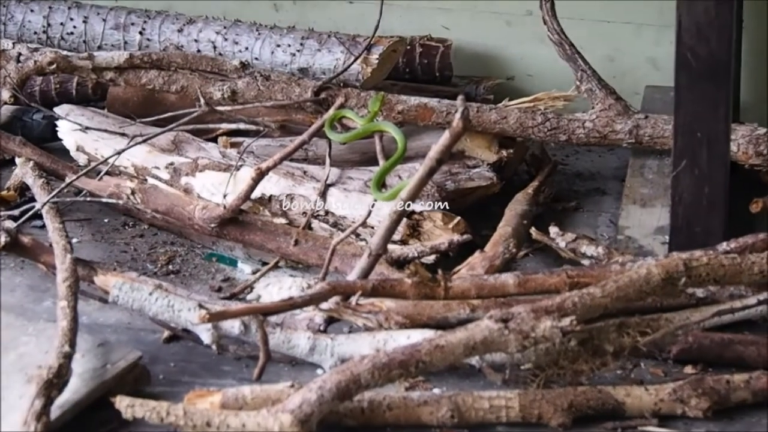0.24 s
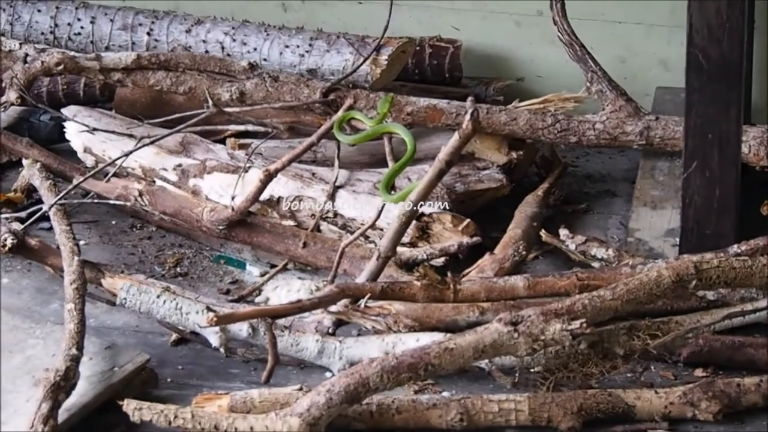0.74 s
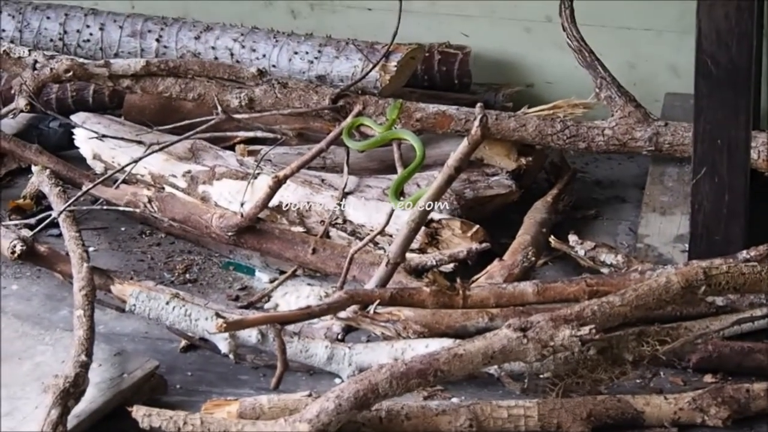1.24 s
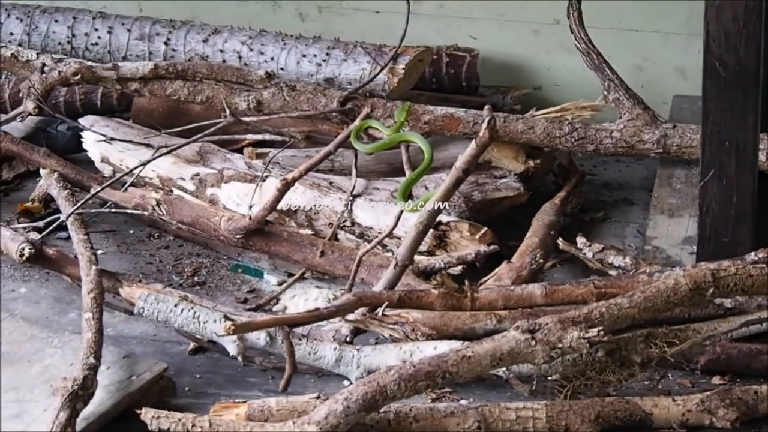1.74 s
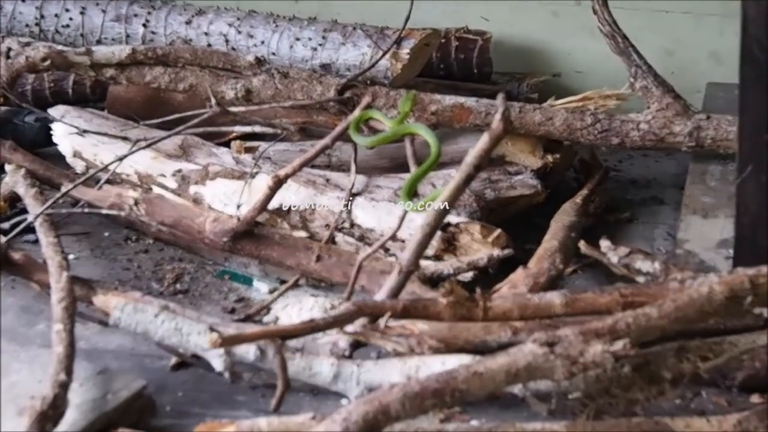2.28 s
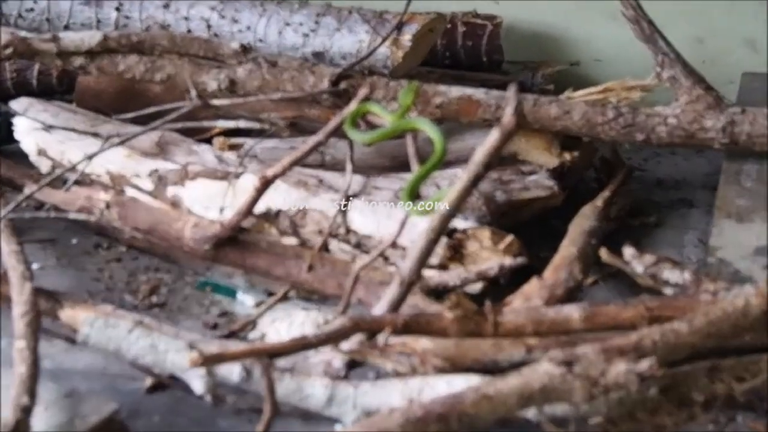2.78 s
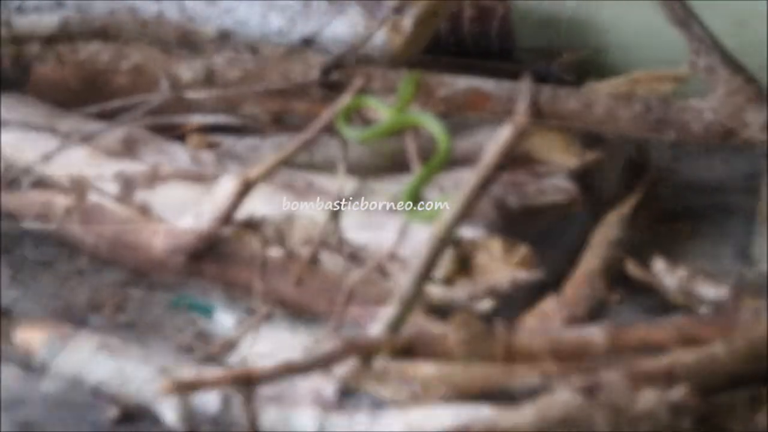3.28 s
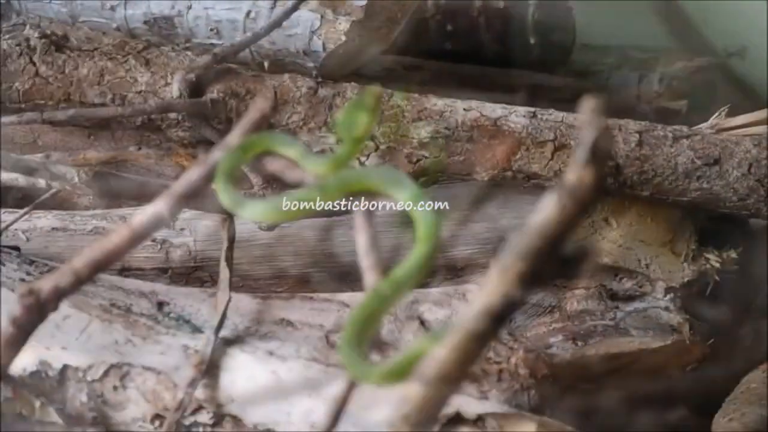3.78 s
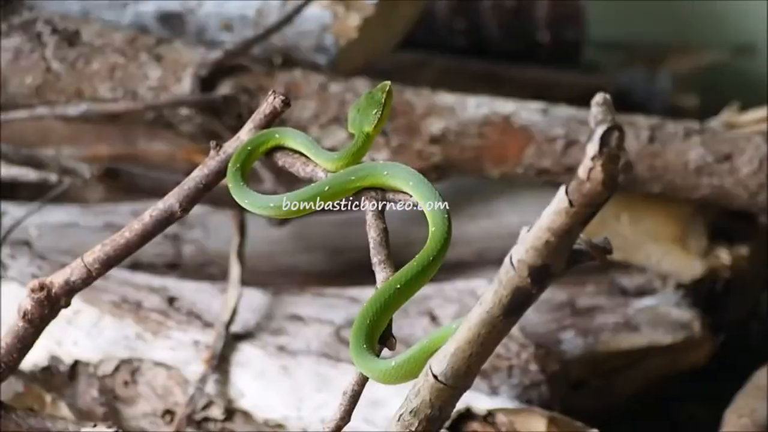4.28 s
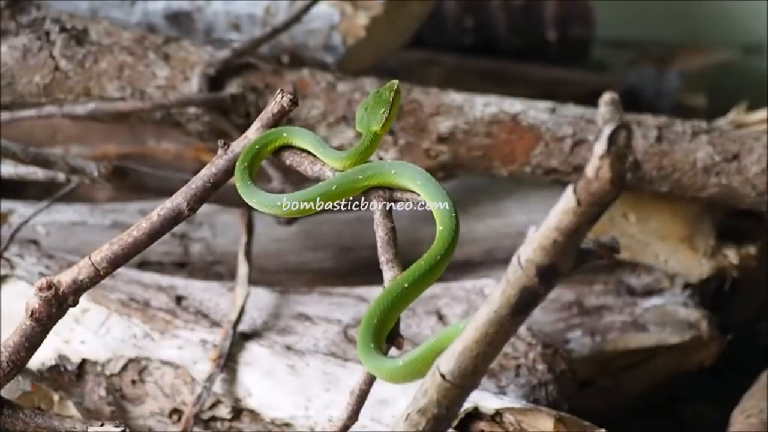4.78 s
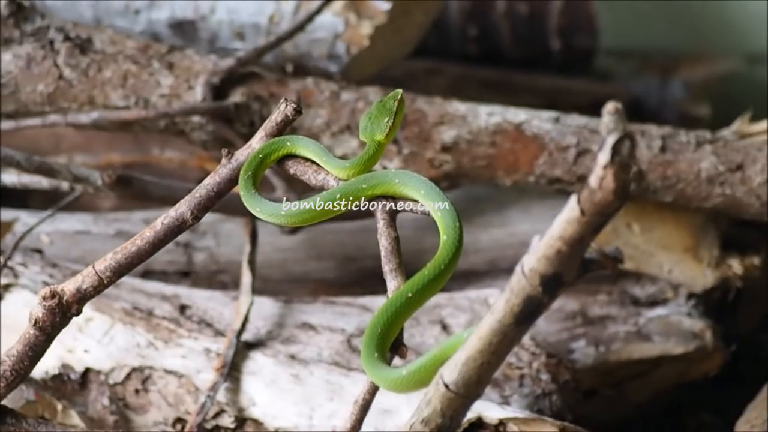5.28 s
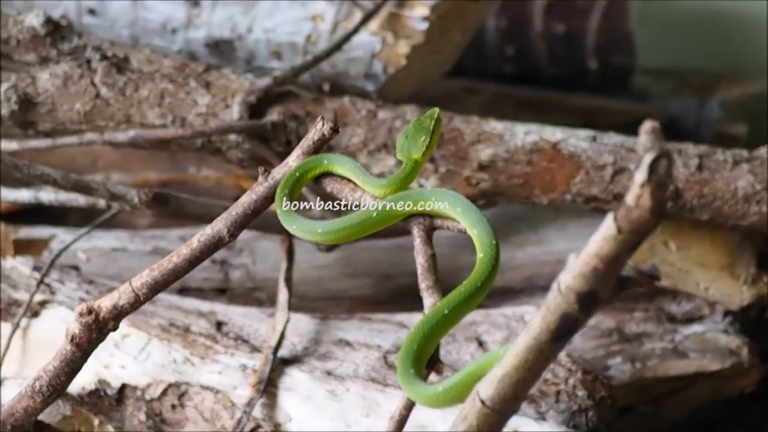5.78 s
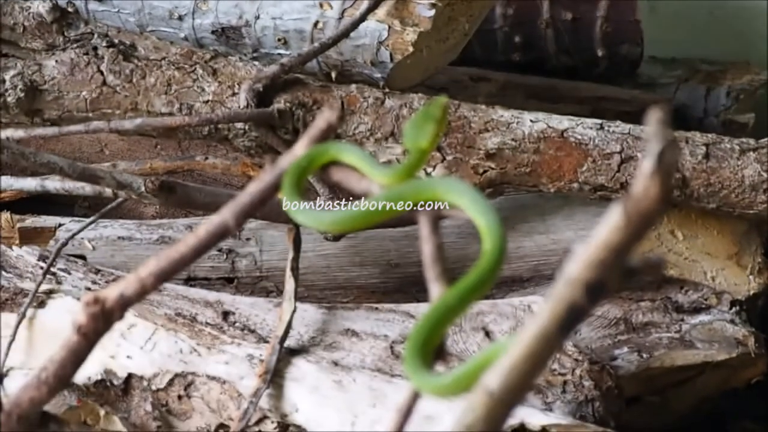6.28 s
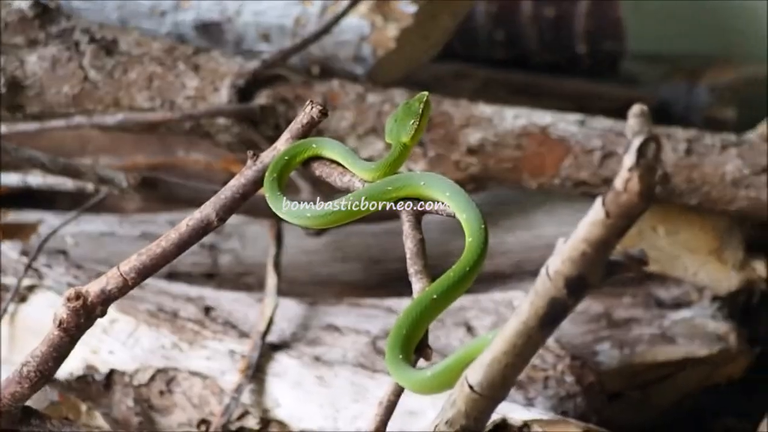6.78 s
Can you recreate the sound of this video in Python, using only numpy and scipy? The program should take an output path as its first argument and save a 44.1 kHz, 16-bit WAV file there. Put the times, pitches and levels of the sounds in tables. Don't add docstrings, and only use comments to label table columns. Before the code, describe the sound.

In a tropical forest, a cicada buzzes close on the right with deep, quick throbs over a hissing chorus of far insects and faint low hum. Short cricket trills recur. A small bird whistles five high falling chirps with woodland echo. A small hand-held camera microphone picks up soft rubs and one sharp knock before the sound shifts to a hazier, more distant cicada.

```python
import sys
import numpy as np
from scipy import signal
from scipy.fft import rfft, irfft, next_fast_len
from scipy.io import wavfile
from scipy.ndimage import uniform_filter1d, map_coordinates

SR = 44100
rng = np.random.default_rng(int(sys.argv[2]) if len(sys.argv) > 2 else 0)


def gain_from_decibels(decibels):
    exponent = np.asarray(decibels, float) / 20
    return 10 ** exponent


def log_audio(samples):
    frames = np.atleast_2d(samples).T
    limited = np.clip(frames, -1, 1)
    pcm = np.round(limited * 32767).astype(np.int16)
    wavfile.write(sys.argv[1], SR, pcm)


N = 310464

# start_s, end_s [s]
TAKES = [
    (-1, 4.15),
    (3.15, 8),
]
LAG_S = 6.7 / 44100
PORTS = np.array([[.5], [-.5]])


def unit(x):
    return x / np.sqrt(np.mean(x ** 2) + 1e-20)


def along(points, hz):
    f, v = np.transpose(points)
    return np.interp(np.log(hz + 1), np.log(f + 1), v)


def curves(rows):
    s, *cols = np.transpose(rows)
    return [np.interp(np.arange(N) / SR, s, c) for c in cols]


def wobble(rate):
    knots = rng.standard_normal(int(N * rate / SR) + 4)
    return map_coordinates(knots, [np.arange(N) * rate / SR])


def filtered(x, response):
    m = next_fast_len(N + SR // 2)
    return irfft(rfft(x, m) * response(np.fft.rfftfreq(m, 1 / SR)), m)[..., :N]


def modes(table):
    def response(f):
        total = 0
        for k, (centre, width, db) in enumerate(table):
            damping = 1j * f * width
            total = total + (-1) ** k * gain_from_decibels(db) * damping / (centre * centre - f * f + damping)
        return total
    return response


def placed(pair, pan_db, lag_s):
    return filtered(pair, lambda hz: gain_from_decibels(PORTS * pan_db(hz)) * np.exp(-2j * np.pi * hz * lag_s * PORTS))


def rush(gain, alike, patchy_db):
    z = signal.stft(rng.standard_normal((2, N)), nperseg=512)[2]
    field = uniform_filter1d(rng.standard_normal(z.shape[1:]), 5, 0)
    field = uniform_filter1d(field, 12, 1)
    pair = signal.istft(z * gain_from_decibels(patchy_db * unit(field)), nperseg=512)[1][:, :N]
    turn = lambda hz: np.arccos(np.clip(along(alike, hz), -1, 1)) / 2
    mid, side = filtered(pair, lambda hz: gain(hz) * [np.cos(turn(hz)), np.sin(turn(hz))])
    return unit(np.array([mid + side, mid - side]))


def trunks(x, t60):
    t = np.arange(SR // 2) / SR
    tail = rng.standard_normal((2, len(t))) * gain_from_decibels(-60 * t / t60) * np.clip(t / 0.034, 0, 1)
    return signal.fftconvolve(x[None], tail / np.linalg.norm(tail[0]), axes=1)[:, :N]


def background(take):
    # pitch_hz [Hz], level_db [dB per Hz]
    chorus_bands = [
        [(1200, -35), (1400, -18), (1900, -12.5), (2500, -7.5), (2950, -10.5), (3600, -5), (4500, -7),
         (5300, -10), (5800, -14.5), (7000, -17.5), (8300, -14.5), (9500, -20), (12000, -25.5), (15800, -27)],
        [(1200, -47), (1400, -24.5), (2100, -11), (2900, -12.5), (3600, -12), (4200, -8), (5200, -12.5),
         (5800, -18.5), (7800, -19.5), (10000, -20.5), (11300, -28), (12600, -27), (15800, -29.5)],
    ]
    # pitch_hz [Hz], likeness [0-1]
    chorus_alike = [
        [(1500, 0.14), (3000, 0.39), (5000, 0.82), (6300, 0.35), (9000, 0.04), (15000, 0.046)],
        [(1500, 0.067), (3800, 0.22), (5000, 0.22), (15000, 0.038)],
    ]
    # pitch_hz [Hz], left_minus_right_db [dB]
    lean = [
        [(60, 3.5), (110, 2), (200, 1), (380, 2), (700, 5.5), (1290, 0), (2380, -1), (4400, -4), (8120, -2.5),
         (15000, 1)],
        [(60, -9), (110, 11), (200, -3), (380, 4.5), (700, 1.5), (1290, 2.5), (2380, -3.5), (4400, -1),
         (8120, -1), (15000, 0.5)],
    ]
    # start_db [dB], drift [dB per s]
    chorus_level = [
        (-34.5, -0.36),
        (-34, 0.04),
    ]
    # pitch_hz [Hz], level_db [dB per Hz]
    air_bands = [(15, -30), (30, -16), (48, -11), (85, -6), (200, -8), (380, -13.5), (600, -11),
                 (1000, -10), (1350, -9.5), (1600, -18.5), (2000, -45), (3300, -120)]
    # pitch_hz [Hz], likeness [0-1]
    air_alike = [(30, .6), (70, .75), (130, .42), (300, .38), (700, .5), (1400, .2)]
    # pitch_hz [Hz], width_hz [Hz], level_db [dB per pass]
    hum_tones = [(69, 15, 0), (100, 12, -4), (131, 13, -2.5), (645, 70, -6)]

    pan = lambda hz: along(lean[take], hz)
    chorus = rush(lambda hz: gain_from_decibels(along(chorus_bands[take], hz)), chorus_alike[take], patchy_db=0.7)
    air = rush(lambda hz: gain_from_decibels(along(air_bands, hz)), air_alike, patchy_db=0.7)
    hum = rush(lambda hz: np.abs(modes(hum_tones)(hz)) ** 2, air_alike, patchy_db=0.7)
    low = gain_from_decibels(-53.5 + 0.44 * wobble(7)) * air + gain_from_decibels(-59.5) * hum
    start_db, drift_db = chorus_level[take]
    level_db = start_db + drift_db * (np.arange(N) / SR - max(TAKES[take][0], 0))
    far_insects = gain_from_decibels(level_db + 0.34 * wobble(9)) * placed(chorus, pan, LAG_S)
    return far_insects + placed(low, pan, -.8 * LAG_S)


def throbs(phrases):
    start, pace = np.transpose(phrases)
    lasts = np.diff(start, append=np.inf)[:, None]
    return pace @ np.clip(np.arange(N) / SR - start[:, None], 0, lasts)


def cicada(song, phrases, body, limp, depth, rough, strain, pan_db, lag_s, wet_db):
    rate, level_db = curves(song)
    ragged = strain * .08 * (rate - 310.5)
    rough, depth, limp = rough + ragged, depth - .4 * ragged, limp + .022 * ragged
    cycles = np.cumsum(rate * (1 + .0018 * wobble(20))) / SR
    stepped = np.floor(cycles + limp * np.cos(np.pi * cycles))
    clicks = np.diff(stepped, prepend=0) * gain_from_decibels(wobble(150))
    scrape = rng.standard_normal(N)
    drive = np.sqrt(1 - rough) * unit(clicks) + np.sqrt(rough) * scrape
    buzz = filtered(drive, lambda hz: modes(body)(hz) ** 2)
    pump = .5 + .5 * np.tanh(2.5 * np.cos(2 * np.pi * throbs(phrases)) + .4)
    throbbing = unit(unit(buzz) * (1 - depth * (1 - pump)))
    buzz = gain_from_decibels(level_db + 0.18 * wobble(12)) * throbbing
    direct = placed(np.array([buzz, buzz]), lambda hz: pan_db, lag_s)
    return direct + gain_from_decibels(wet_db) * trunks(buzz, t60=.07)


def near_cicada():
    # time_s [s], click_rate [clicks per s], level_db [dB]
    song = [(0, 310.5, -36.5), (.6, 311, -36.5), (1.5, 313.5, -38), (2, 315.5, -38.5), (2.6, 314.3, -39.5),
            (4.15, 313.7, -40)]
    # start_s [s], pace [throbs per s]
    phrases = [
        (-.162, 16.94),
        (1.55, 13.74),
        (2.205, 25.4),
        (2.638, 27.3),
    ]
    # pitch_hz [Hz], width_hz [Hz], level_db [dB per pass]
    body = [(2200, 600, -5.5), (3600, 550, -4.5), (4070, 250, 1.6), (4880, 450, -2.6), (6200, 800, -7.5),
            (7350, 400, -6.5)]
    return cicada(song, phrases, body, limp=.005, depth=.93, rough=.08, strain=1,
                  pan_db=-3.5, lag_s=LAG_S, wet_db=-8)


def handling():
    # start_s [s], level_db [dB], length_s [s]
    knocks = [
        (0.026, -49.5, 0.066),
        (1.979, -50.5, 0.058),
        (2.455, -52.5, 0.07),
        (3.175, -41.5, 0.017),
        (3.266, -50, 0.078),
        (3.36, -47.5, 0.093),
    ]
    # pitch_hz [Hz], width_hz [Hz], level_db [dB]
    shell_modes = [(298, 140, -1.5), (493, 74, -8), (980, 400, 5.5)]
    t, touch = np.arange(N) / SR, np.zeros(N)
    for s, db, length in knocks:
        u = np.clip((t - s) / length, 0, None)
        touch += gain_from_decibels(db + 8) * u * np.exp(1 - 2 * u)
    shell = unit(filtered(rng.standard_normal(N), modes(shell_modes)))
    dulled = filtered(touch * shell, lambda hz: 1 / (1 + 1j * hz / 1300) ** 2)
    return dulled * gain_from_decibels([[2.5], [-1.5]])


def cricket():
    # start_s [s], level_db [dB], pitch_hz [Hz], length_s [s], left_minus_right_db [dB]
    bursts = [
        (0.384, -31, 4840, 0.17, 6),
        (1.082, -28, 4800, .1, 0),
        (1.728, -27, 5030, 0.1, 0),
        (3.32, -32, 4970, 0.11, 7),
        (4.556, -29, 4880, 0.1, 4),
        (5.15, -28, 5380, 0.077, 1),
        (5.2, -31, 4950, 0.09, 1),
        (6.442, -30, 4900, .16, -1),
    ]
    out, t = np.zeros((2, N)), np.arange(N) / SR
    for s, db, hz, length, pan_db in bursts:
        swell = np.sin(np.pi * np.clip((t - s) / length, 0, 1))
        strokes = (0.53 + 0.14 * np.sin(2 * np.pi * 38 * (t - s))) * swell
        wing = unit(filtered(rng.standard_normal((2, N)), lambda f: modes([(hz, 450, 0)])(f) ** 2))
        out += gain_from_decibels(db - 4 + pan_db * PORTS) * strokes * wing
    return out


def bird():
    # start_s [s], level_db [dB], start_hz [Hz], dip_hz [Hz]
    chirps = [
        (1.34, -29.5, 9250, 8530),
        (1.569, -29, 8970, 8425),
        (1.792, -29, 9080, 8570),
        (2.012, -29.5, 9055, 8600),
        (2.24, -29.5, 9016, 8560),
    ]
    turns_s = [0, .02, .03, .05, .063, .1]
    crest_hz, bend_hz, end_hz = 8860, 8550, 7360
    attack_s, chirp_s, release_s, sag_db_per_s = .015, .102, .01, 95

    out, t = np.zeros((2, N)), np.arange(SR // 8) / SR
    ramps = np.minimum(t / attack_s, (chirp_s - t) / release_s)
    shape = np.clip(ramps, 0, 1) * gain_from_decibels(-sag_db_per_s * t)
    for s, db, start_hz, dip_hz in chirps:
        path = [start_hz, dip_hz, dip_hz, crest_hz, bend_hz, end_hz]
        pitch = uniform_filter1d(np.interp(t, turns_s, path), size=400, mode="nearest")
        flutter = gain_from_decibels(2.8 * wobble(110)[:len(t)])
        voice = gain_from_decibels(db + 9.5) * flutter * shape * np.sin(2 * np.pi * np.cumsum(pitch) / SR)
        branches, forest = trunks(voice, t60=.12), trunks(voice, t60=.8)
        voice = np.pad(voice, (0, forest.shape[1] - len(t)))
        slap = np.roll(voice, round(.043 * SR)) * gain_from_decibels([[-22], [-21]])
        heard = voice * gain_from_decibels([[-16.5], [-3.5]]) + slap
        heard = heard + gain_from_decibels([[-16], [-17]]) * branches + gain_from_decibels([[-10], [-11]]) * forest
        out[:, round(s * SR):][:, :len(voice)] += heard
    return out


def far_cicada():
    # time_s [s], click_rate [clicks per s], level_db [dB]
    song = [(3.15, 329, -42.5), (4.6, 333, -44.5), (5.3, 329, -46.5), (6.55, 326, -46.5), (6.7, 326, -51)]
    # start_s [s], pace [throbs per s]
    phrases = [
        (3, 23.9),
    ]
    # pitch_hz [Hz], width_hz [Hz], level_db [dB per pass]
    body = [(2310, 150, -6), (2665, 160, 0), (3260, 130, -3.5), (4680, 200, -4.5), (4990, 180, -6),
            (7660, 300, -8.5)]
    return cicada(song, phrases, body, limp=0, depth=.3, rough=.75, strain=0,
                  pan_db=-1, lag_s=.55 * LAG_S, wet_db=4)


def scene():
    t = np.arange(N) / SR
    on = [np.clip((t - a) / 0.0023, 0, 1) * np.clip((b - t) / 0.074 + .5, 0, 1) for a, b in TAKES]
    first = background(take=0) + near_cicada()
    second = background(take=1) + far_cicada()
    return on[0] * first + on[1] * second + handling() + cricket() + bird()


def roll_off(x):
    return signal.sosfilt(signal.butter(12, 15790, fs=SR, output="sos"), x)


def record(dry):
    top_hz = 15790
    notch = lambda hz: 1 - .76 * modes([(1400, 290, 0)])(hz)
    heard = filtered(dry, lambda hz: notch(hz) * (hz < top_hz))
    return roll_off(heard - .0005)


dry = scene()
out = record(dry)
log_audio(out)
```